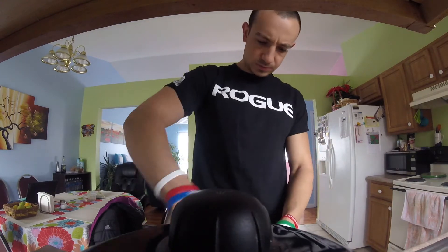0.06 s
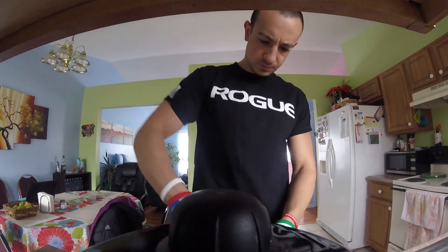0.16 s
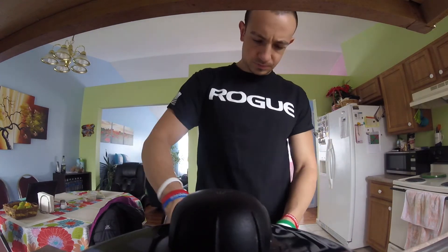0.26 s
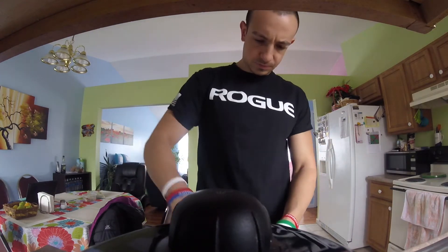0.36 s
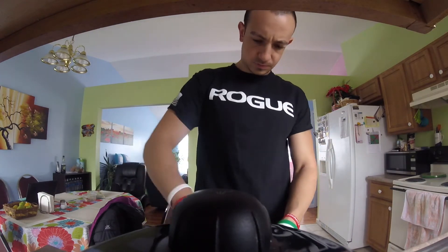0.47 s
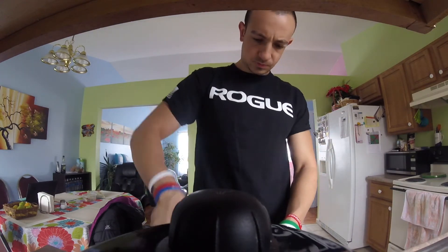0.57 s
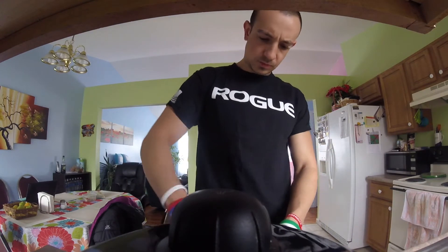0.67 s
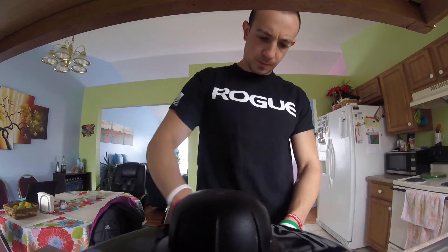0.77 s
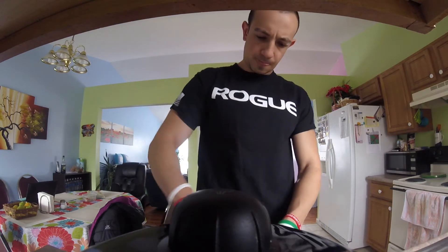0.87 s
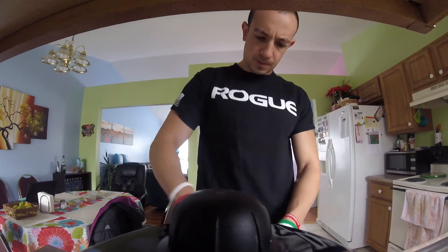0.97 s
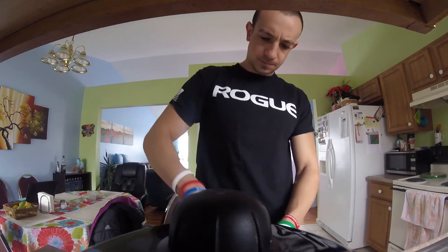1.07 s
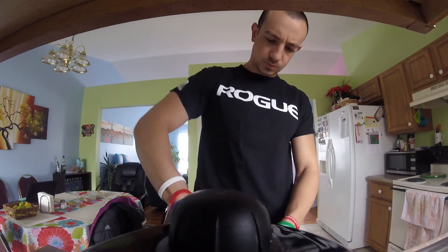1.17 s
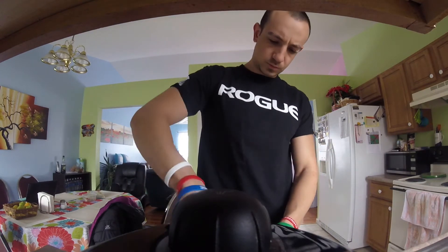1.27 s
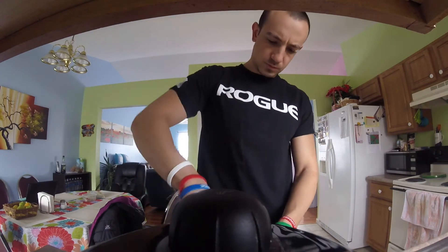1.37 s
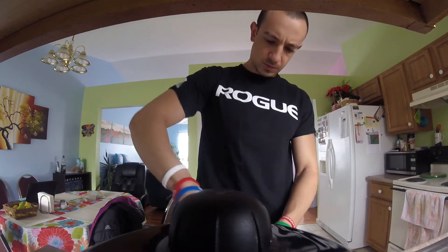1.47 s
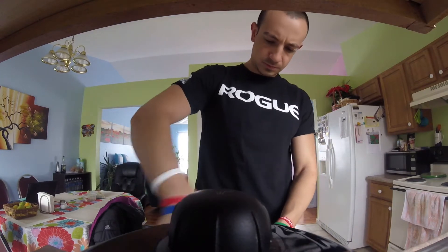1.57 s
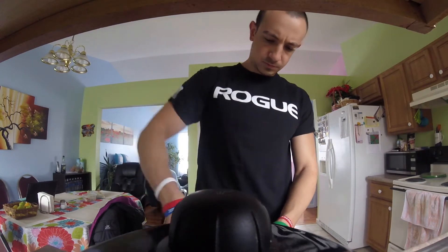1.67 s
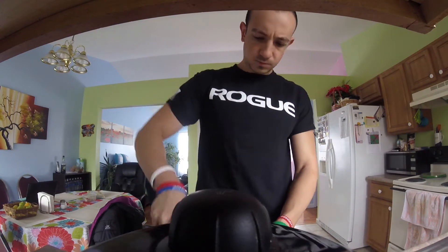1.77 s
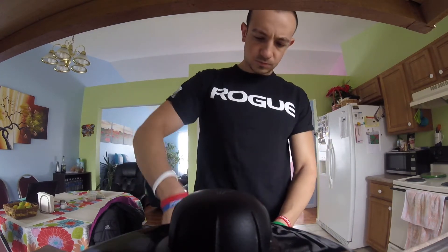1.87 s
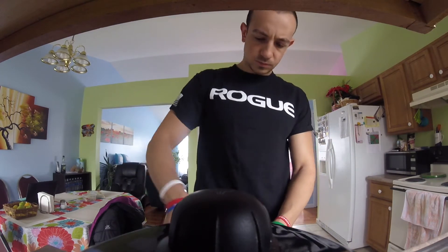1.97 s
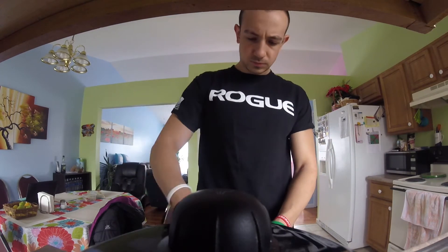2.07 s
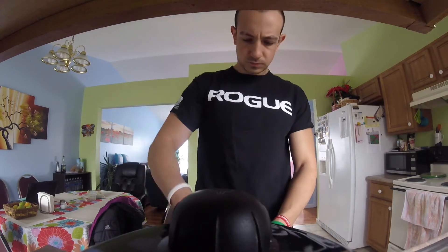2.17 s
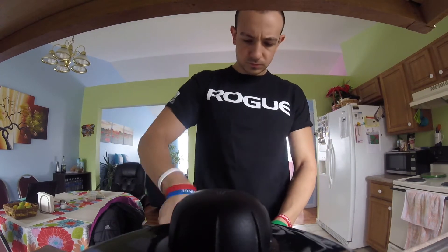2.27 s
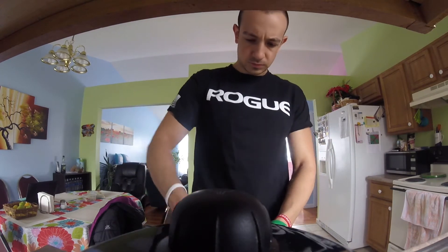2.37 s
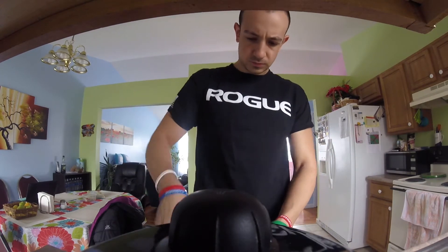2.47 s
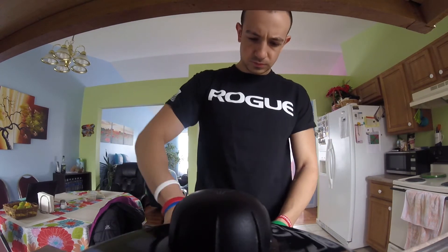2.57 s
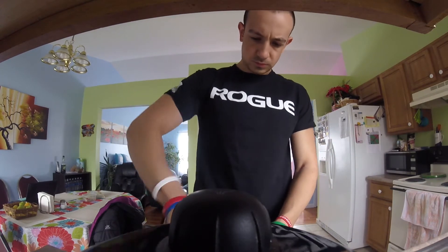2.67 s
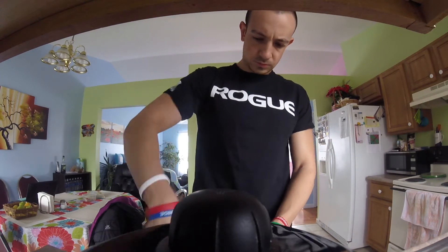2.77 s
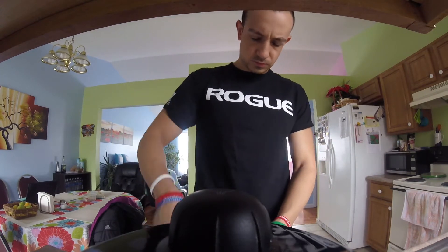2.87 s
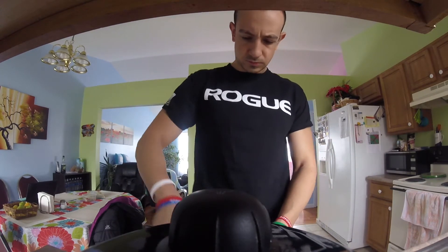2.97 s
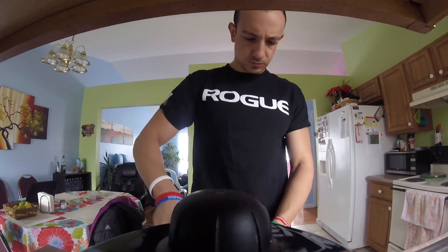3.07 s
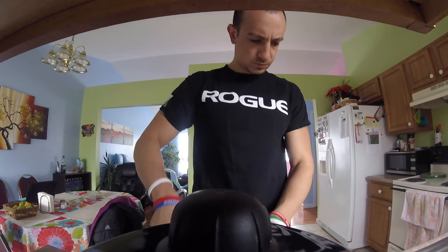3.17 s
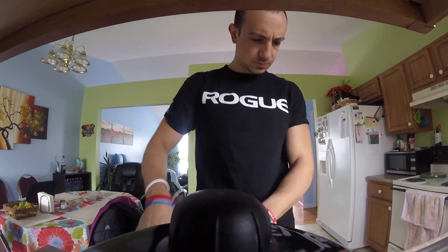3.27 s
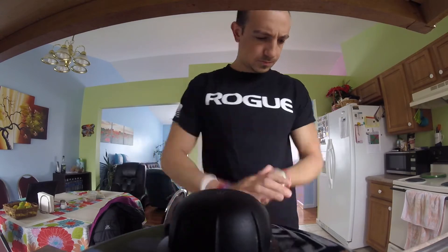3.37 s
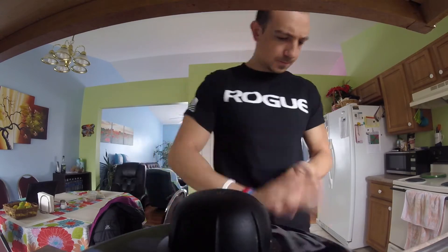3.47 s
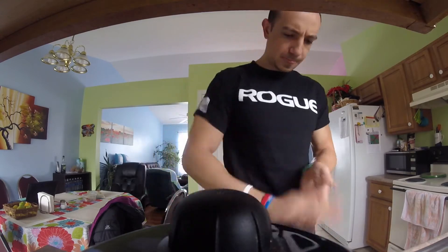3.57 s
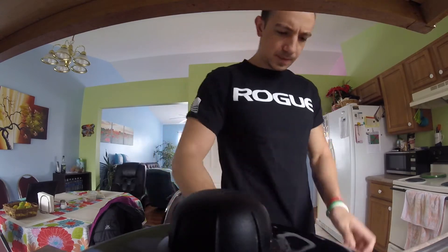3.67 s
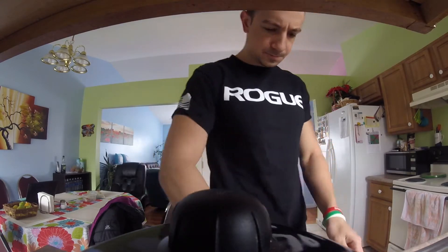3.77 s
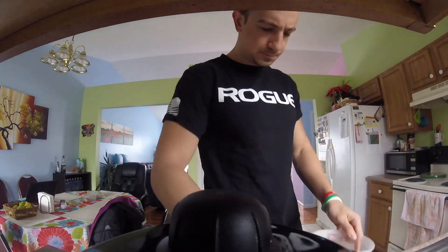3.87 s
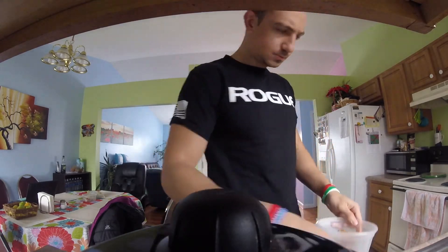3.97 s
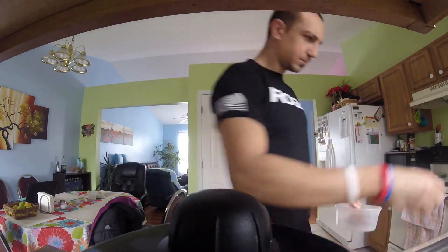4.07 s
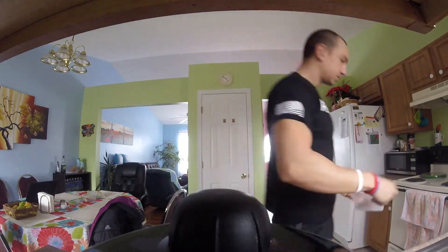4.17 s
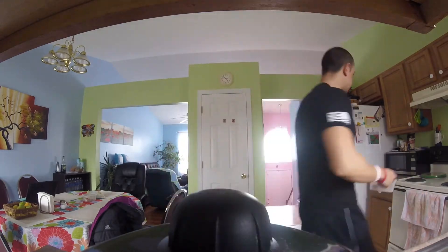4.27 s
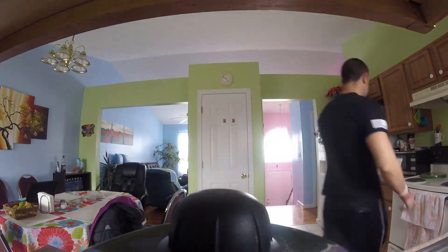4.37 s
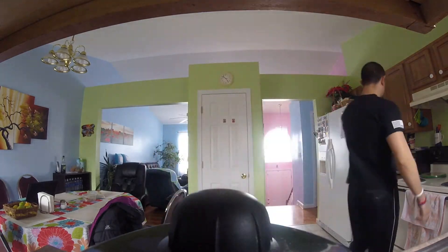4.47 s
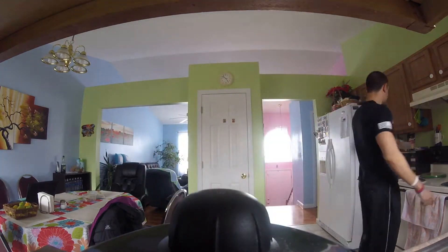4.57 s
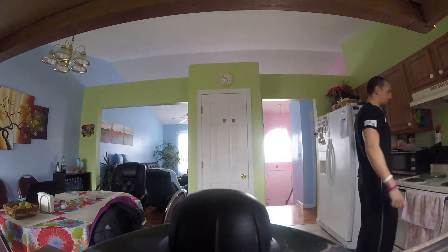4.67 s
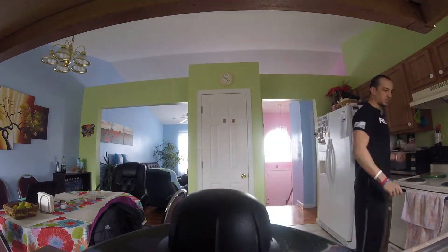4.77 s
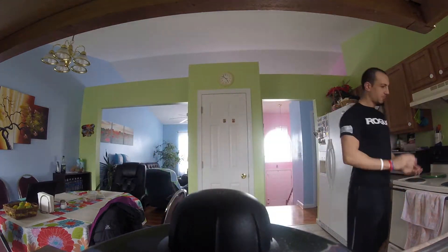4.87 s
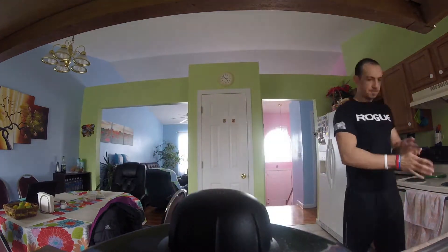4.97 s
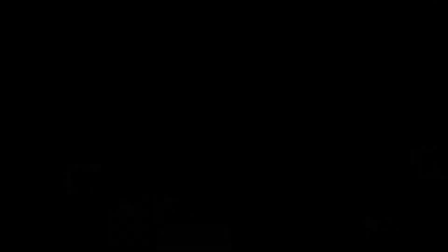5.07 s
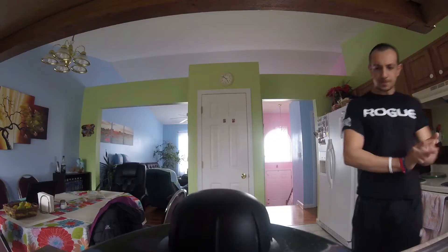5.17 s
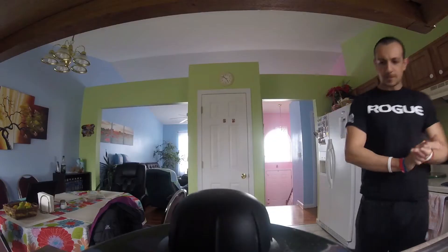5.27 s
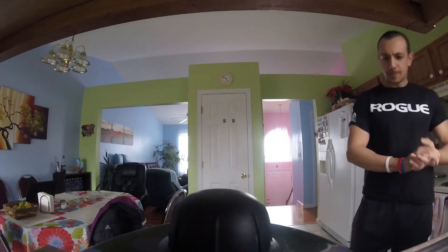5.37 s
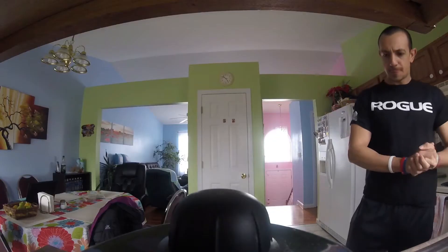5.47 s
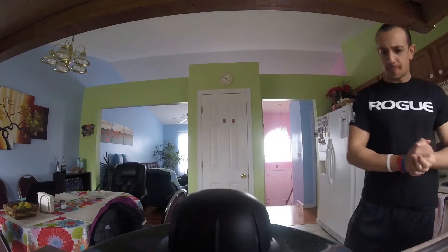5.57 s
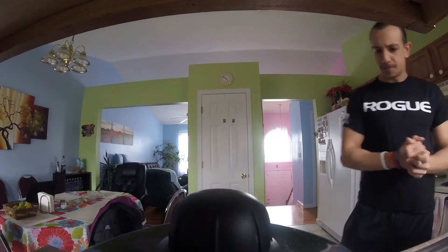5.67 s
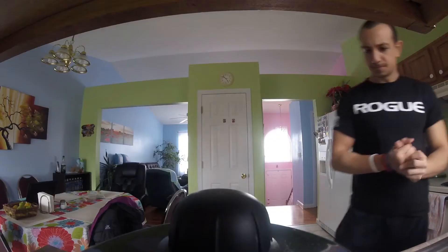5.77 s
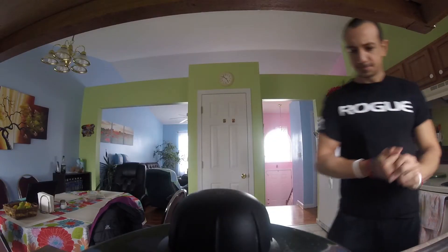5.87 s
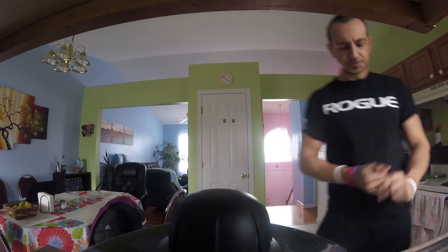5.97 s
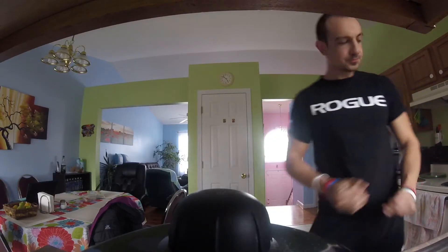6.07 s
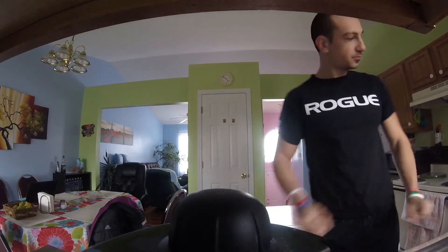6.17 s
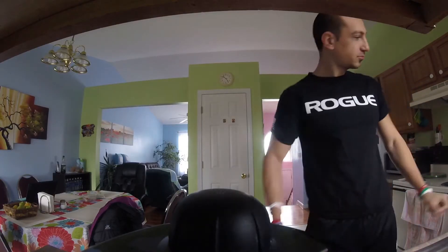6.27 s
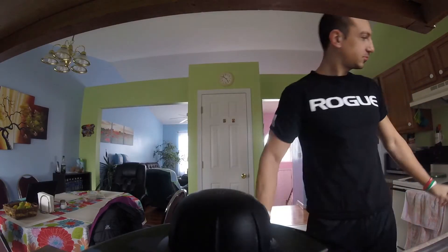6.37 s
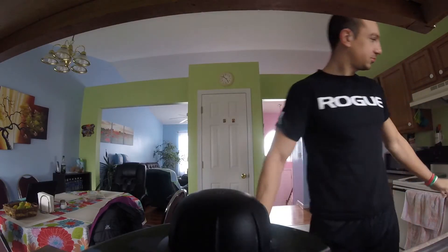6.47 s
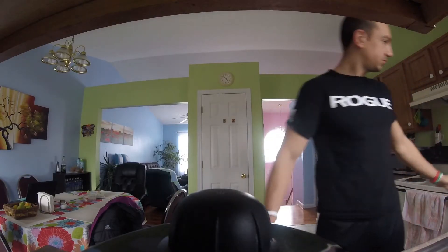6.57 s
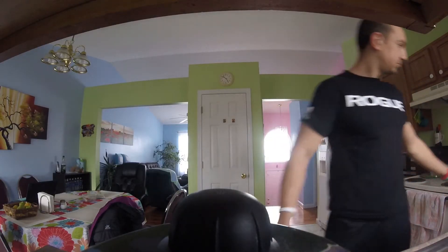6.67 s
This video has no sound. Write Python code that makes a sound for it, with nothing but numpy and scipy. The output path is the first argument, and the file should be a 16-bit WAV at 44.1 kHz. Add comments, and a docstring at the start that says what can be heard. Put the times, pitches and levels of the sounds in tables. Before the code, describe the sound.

From 0 to about 3.2 s, a spoon stirs a stiff mix in a steel bowl, heard very close from a microphone on the same counter. Irregular dull thuds, several each second, boom through the counter, strongest around 0.6-1.1 s and 1.8-2.8 s, some slightly overloaded. Low rocking rumble and dragging lie beneath; thin, gritty steel scrapes and short clinks ride above. At 3.32 s two very quick raps on the rim crack brightly and shimmer briefly over a heavy thump. The kitchen then falls quiet: small clicks around 3.5-3.6 s, soft footfalls, cloth rustle, and distant objects set down, clearest at 4.67-4.73 and 4.95 s. At 5.12 s sound drops almost to silence for an instant, then returns with a different background: low steady hum, faint rustling and soft taps near 5.4, 5.7 and 5.8 s, until about 6.7 s.

```python
"""A spoon stirs a stiff mix in a steel bowl on a kitchen counter, with the microphone on the same counter.
For 3.3 s blows thud through the counter as beating modes; filtered-noise scrapes and clinks come by air.
Two raps on the rim end the stirring; then small things are set down across the room as short noise bursts,
soft footfalls rumble in low noise and cloth rustles. At 5.12 s comes a near-silent edit cut of 33 ms,
then another background with a low hum, more rustling and a few last things set down."""
import sys
import numpy as np
from scipy import signal
from scipy.fft import rfft, irfft
from scipy.io import wavfile
from scipy.ndimage import uniform_filter1d

SR = 44100
rng = np.random.default_rng(int(sys.argv[2]) if len(sys.argv) > 2 else 0)


def output_pcm(signal):
    """Save a mono or channel-first signal as 16-bit PCM at the path in sys.argv[1].

    Samples are clipped to [-1, 1] before scaling.
    """
    pcm = np.clip(np.atleast_2d(signal).T, -1, 1) * 32767
    wavfile.write(sys.argv[1], SR, np.round(pcm).astype(np.int16))


N = 296352

# counter modes, a close pair and then overtones: f/Hz, level/dB, t60/s
COUNTER_MODES = [(238.64, 2.5, 0.13), (261.7, 2.5, 0.086), (517, -11, 0.038), (621, 4.5, 0.054),
                 (819, 4.5, 0.031), (944, -7, 0.043), (1255, -8, 0.033)]
# bowl modes: f/Hz, width/Hz, level/dB
BOWL_MODES = [(1275, 150, -7), (1920, 14, -15), (2593, 55, -12.5), (3060, 73, -3.5), (4020, 24, -11.5),
              (5560, 470, -10), (6210, 63, -28), (7680, 54, -12), (7600, 110, -12), (9480, 93, -29),
              (11950, 140, -9), (14000, 900, -16)]
# strength of the stirring: t/s, scrape treble/dB, drag on the counter/dB, scrape body/dB
STIRRING = [(0.0, -68, -30, -55.5), (0.16, -57, -39.5, -62.5), (0.27, -64, -46.5, -60),
            (0.43, -64.5, -32.5, -66), (0.54, -72, -38.5, -58.5), (0.64, -59, -25.5, -57.5),
            (0.73, -72, -32, -56.5), (0.81, -53.5, -23, -59), (0.87, -57, -19.5, -49),
            (0.95, -54, -25, -48.5), (1.04, -57, -19.5, -59), (1.1, -74, -31.5, -75),
            (1.18, -65, -43, -64.5), (1.38, -73, -38, -67.5), (1.66, -59, -36.5, -57.5),
            (1.75, -67, -40, -63), (1.92, -73, -32.5, -59.5), (2.05, -55, -34.5, -54),
            (2.1, -51.5, -23.5, -48.5), (2.21, -55, -22, -54), (2.25, -62, -24, -55), (2.36, -54, -29, -56),
            (2.53, -77, -43, -78), (2.67, -64, -36.5, -60), (2.84, -50.5, -36.5, -51.5),
            (2.92, -74, -38, -62.5), (3.08, -68, -33.5, -62), (3.22, -72.5, -38, -70),
            (3.3, -67, -45.5, -63)]
# the near-silent edit cut between two backgrounds: start/s, end/s
CUT = (5.119, 5.152)


def thuds(lead_s=0.007683, rise_s=0.0036, overtones_spread_db=2.5):
    """Two close counter modes start in opposite phase: the thud swells, then beats away."""
    # blows felt through the counter: t/s, peak level/dB, upper mode of the pair against lower/dB,
    # ring time as a factor (held to 3 at most), mean overtone level/dB
    blows = [(0.022, -27.5, 3, 1, -26), (0.052, -21.5, 3, 0.94, -31.0), (0.082, -20, 5, 0.71, -29),
             (0.123, -40, 9, 0.89, -33), (0.159, -16.5, 4.5, 1.34, -33), (0.23, -30, 5, 1.2, -28),
             (0.323, -25, -12, 3.6, -36), (0.392, -18.5, 2.5, 2.2, -31.0), (0.454, -18, -8, 3.4, -30.5),
             (0.494, -14, 4, 1.3, -31.5), (0.53, -27, 4, 0.78, -31.0), (0.56, -18.5, 2, 0.85, -30),
             (0.625, -12.5, -2, 2, -31.0), (0.658, -13, 1, 0.75, -27), (0.706, -12.5, -5, 1.8, -35),
             (0.787, -19.5, 4, 2.1, -31.0), (0.796, -8.5, 12, 1.8, -36), (0.845, -17, 7, 1.4, -40),
             (0.906, -12, 1, 1.4, -31.0), (0.969, -11.5, -0.5, 0.63, -31.0),
             (0.996, -6.5, 2.2, 1.17, -31.0), (1.056, -12.5, 2, 1.3, -26), (1.144, -25.5, -3, 1.9, -35),
             (1.175, -17, 3.5, 2.4, -33), (1.223, -18, 2, 1.1, -29), (1.266, -50, 14, 0.88, -31.0),
             (1.342, -28.5, -3, 1.3, -26), (1.419, -19, 5, 2.3, -34), (1.453, -18.5, 0.7, 0.46, -31.0),
             (1.521, -17.5, -1, 0.73, -32), (1.544, -12, 0.8, 1.47, -31.0), (1.659, -26, 0.1, 1.2, -31.0),
             (1.686, -27.5, -18, 1.5, -27), (1.713, -24.5, 0.1, 1.8, -32), (1.792, -46, -2, 0.86, -31.0),
             (1.821, -13, 1.5, 1.4, -29), (1.857, -13.5, 0, 1.9, -35), (1.882, -8.5, 11.5, 0.66, -31.0),
             (1.95, -31, 6, 0.42, -31.0), (1.99, -18, -11, 2.2, -38), (2.062, -17.5, -2, 3, -31.0),
             (2.116, -15, -4, 1.2, -25), (2.159, -13.5, -6, 1.7, -33), (2.203, -9.5, 5, 2.4, -33),
             (2.248, -24, -9, 1, -33), (2.276, -12, -1.5, 0.63, -24), (2.339, -9, -3.8, 1.87, -25.5),
             (2.429, -21.5, 3.5, 0.63, -25), (2.487, -27.5, 5, 0.61, -31.0), (2.55, -10, -8.5, 1.5, -29),
             (2.609, -13, 2, 0.75, -30), (2.689, -26.5, 0.1, 1, -27), (2.714, -7.5, 0, 0.97, -25),
             (2.77, -16.5, -6, 1.14, -32), (2.819, -30, -2, 0.62, -31.0), (2.845, -31, 1, 0.8, -31.0),
             (2.899, -48, 5, 1.5, -31.0), (2.933, -22.5, 3, 2.2, -30), (2.958, -15, 2, 2.1, -32),
             (2.995, -16.5, 4, 3.6, -38), (3.062, -12, -2.3, 0.97, -34.5), (3.139, -29, -14, 1.9, -30),
             (3.179, -34, 0.1, 1.4, -28), (3.218, -33, -2, 1.8, -29), (3.327, -8, 3.5, 1.18, -30),
             (3.799, -34, 6, 1.8, -31.0)]
    out = np.zeros(N)
    t = np.arange(SR // 4) / SR
    hz, db, t60 = np.transpose(COUNTER_MODES)[:, :, None]
    place = np.arange(len(COUNTER_MODES))[:, None]
    sign = (-1.) ** place
    spots = rng.standard_normal((len(blows), len(COUNTER_MODES), 1))
    for (s, peak_db, upper_db, lasting, overtones_db), spot in zip(blows, spots):
        over_db = overtones_db + overtones_spread_db * spot
        decay_db = 60 * t / (t60 * np.minimum(lasting, 3))
        level_db = db + (place == 1) * upper_db + (place > 1) * over_db - decay_db
        modes = sign * amp(level_db) * np.sin(2 * np.pi * hz * t)
        ring = modes.sum(0) * (1 - np.exp(-t / rise_s))
        add(out, s - lead_s, amp(peak_db) * peaked(ring))
    return out


def drag(over_db=-42.5):
    """The dragging spoon shakes the same counter modes without pause."""
    shake = rng.standard_normal(N)
    modes = []
    for hz, db, t60 in COUNTER_MODES:
        ring = resonate(resonate(shake, hz, 2.4 / t60), hz, 76.0)
        modes.append(amp(db) * evened(ring))
    shaken = evened(modes[0] + modes[1] + amp(over_db) * sum(modes[2:]))
    return curve(STIRRING, axis=2) * shaken


def rocking(wobble=0.0907, fuzz=0.56, octave_fuzz=0.93):
    """The counter sways under the arm: a wavering tone, its octave, and some rumble around them."""
    # sway: t/s, f/Hz, level/dB, octave level/dB
    sway = [(0.0, 70.3, -51.5, -56.5), (0.11, 70.82, -38.5, -54), (0.23, 70.06, -51, -72),
            (0.5, 77.37, -45.5, -45), (0.61, 76.45, -37, -59), (0.68, 72.56, -28, -37),
            (0.73, 73.5, -40, -49), (0.98, 73.56, -31, -28.5), (1.06, 61.9, -34, -40),
            (1.28, 61.4, -52, -86), (1.39, 68.5, -33, -47), (1.48, 67.6, -47, -65), (1.56, 72.95, -32, -37),
            (1.69, 75.5, -47.5, -81), (1.84, 74.95, -37, -37), (1.94, 58, -26.5, -26),
            (2.07, 56.77, -43, -60), (2.12, 56.3, -28, -27), (2.18, 58, -32, -30), (2.31, 75.9, -36, -44),
            (2.35, 75.3, -28.5, -31), (2.48, 75.7, -43, -61), (2.6, 76.8, -41, -48), (2.65, 69.6, -49, -70),
            (2.73, 59.1, -33.5, -41), (2.83, 60.9, -40.5, -55), (2.92, 70.2, -47.5, -71),
            (3.06, 66.9, -34, -45), (3.25, 62.9, -59, -80), (3.32, 71.7, -48, -60), (3.41, 72, -57, -87),
            (3.53, 59.7, -56.5, -80), (3.83, 65.5, -51, -82), (4.0, 78.5, -69, -83)]
    waver, rumble = rng.standard_normal((N, 2)).T
    hz = over_time(sway, axis=1) * (1 + wobble * evened(uniform_filter1d(waver, size=2000)))
    turn = 2 * np.pi * np.cumsum(hz) / SR
    low = np.sqrt(2) * np.sin(turn) + fuzz * evened(band(rumble, (50, 85)))
    octave = np.sqrt(2) * np.sin(2 * turn) + octave_fuzz * evened(band(rumble, (100, 150)))
    both = curve(sway, axis=2) * evened(low) + curve(sway, axis=3) * evened(octave)
    return band(both, (38, 400))


def scrape(slips_per_s=500., spread_db=4.5, smooth=0.99, ring_db=-5.0, patchy_db=3.5):
    """Uneven slips of steel on steel over a smooth hiss; the colour shifts in random patches."""
    # colour of the steel-on-steel noise: f/Hz, level/dB per Hz
    steel = [(500, -20), (1000, 2), (2200, -10), (3100, 2), (4500, -0.5), (7800, 3), (9500, 1), (11500, -9),
             (14000, 2), (16000, -1.5)]
    slipping = rng.random(N) < slips_per_s / SR
    size = amp(spread_db * np.minimum(rng.exponential(1, N), 4)) * slipping
    slips = signal.lfilter([1], [1, -.975], size) * rng.standard_normal(N)
    drive = evened(slips) + smooth * rng.standard_normal(N)

    # each mode's level drifts slowly at random
    drifts = rng.standard_normal((N // 1024 + 2, len(BOWL_MODES))).T
    bowl = np.zeros(N)
    for (hz, width, db), knots in zip(BOWL_MODES, drifts):
        drift = np.interp(np.arange(N) / 1024, np.arange(len(knots)), knots)
        bowl += amp(db + 8.7 * drift) * evened(resonate(drive, hz, width))

    rubbed = evened(coloured(drive, steel)) + amp(ring_db) * evened(bowl)
    hz, t, z = signal.stft(rubbed, SR, nperseg=256)
    z = z * amp(patchy_db * patches(len(t), bins=len(hz), count=8))
    treble = np.clip((hz[:, None] - 5500) / 2000, 0, 1)
    body = evened(signal.istft(z * (1 - treble), SR, nperseg=256)[1][:N])
    fizz = evened(signal.istft(z * treble, SR, nperseg=256)[1][:N])
    return curve(STIRRING, axis=3) * body + curve(STIRRING, axis=1) * fizz


def clinks(ring_db=-7.0, away_db=22.0, low_away_db=29.0, low_width=50.0, damping_hz=149.0):
    """A blow rings the bowl modes and the counter overtones that lie near its spot's pitches."""
    # spoon on bowl: t/s, level/dB, lows/dB, highs/dB, top/dB, t60/s, tail/dB, bright f/Hz, knock f/Hz
    knocks = [(0.0503, -43, -0.5, 2, -21, 0.02, -25, 3360, 495),
              (0.0765, -33, -9.5, -9, -20, 0.035, -23, 3200, 600),
              (0.161, -47, -6, -10, -7, 0.053, -12, 1700, 509),
              (0.3456, -43, 2.5, -18, -26, 0.052, -17.0, 1900, 493),
              (0.3843, -43, -10, -10, -16, 0.067, -21, 2910, 495),
              (0.4033, -40, -9, -9, -6, 0.04, -17.0, 3030, 517),
              (0.4274, -41, -13, -14, -16, 0.04, -17.0, 2920, 498),
              (0.4426, -33.5, -34, -12, -9, 0.052, 0.5, 4200, 506),
              (0.4708, -35, -6, 1.5, -12, 0.021, -20, 1730, 493),
              (0.4816, -32, -14, 1, -16, 0.078, -9, 1970, 522),
              (0.533, -30, -16, -20, -29, 0.02, -24, 3040, 498),
              (0.5594, -48, 8, -16, -15, 0.04, -19, 3130, 533),
              (0.597, -41, -14, -15, -15, 0.035, -17.0, 2010, 611),
              (0.618, -39, -3.5, -5, -17, 0.058, -20, 2490, 848),
              (0.6355, -42, 10, -7, -7, 0.026, -26, 1780, 598),
              (0.6509, -28, -13, 4, -5, 0.047, -5, 8500, 493),
              (0.6973, -33.5, -15, -15, -14, 0.087, -17.0, 3100, 493),
              (0.7711, -38, -12, 8.5, -16, 0.047, -6, 7910, 493),
              (0.7907, -22.5, -25, -11, -26, 0.046, -10.5, 3050, 493),
              (0.8459, -40, 18, -18, -26, 0.04, -16, 1720, 614),
              (0.8664, -36, -11, 3, -7, 0.069, -3, 7770, 506),
              (0.9004, -30.5, -2.5, -14, 1, 0.049, -24, 7900, 493),
              (0.9518, -29, -3, -17, -25, 0.068, -23, 3240, 493),
              (0.9666, -29.5, -7, 3, -3, 0.04, -13, 3450, 576),
              (0.9897, -23.5, -6, -2, -7, 0.048, -12, 6560, 506),
              (1.041, -35.5, -5, -17, -26, 0.034, -17.0, 3460, 619),
              (1.0534, -39, 0, -14, -14, 0.036, -19, 1890, 536),
              (1.063, -32, -5.5, -22, -5, 0.061, -15, 1770, 493),
              (1.0994, -50.5, -17, 10.5, -18, 0.031, -23, 1810, 501),
              (1.1684, -53.5, 9, 1, -12, 0.064, -2, 1780, 851),
              (1.2121, -56, 3, -11, -20, 0.032, -5, 1720, 598),
              (1.3583, -50.5, 4, 1, -7, 0.053, -17.0, 3190, 778),
              (1.3818, -56, 3, 6, -7, 0.047, -2, 1730, 864), (1.42, -38, -6, 2, -4, 0.056, -28, 8470, 514),
              (1.4429, -37, 1, -19, -22, 0.033, -16, 2860, 595),
              (1.5161, -56, -6, -25, -22, 0.027, -17.0, 1950, 493),
              (1.5365, -29.5, -2, -15, -22, 0.037, -15, 2690, 786),
              (1.5534, -36.5, -18, 2, -7, 0.045, -7.5, 1700, 506),
              (1.6857, -41.5, -16, 2, -19, 0.035, -18, 7450, 600),
              (1.79, -47.5, -3, -13, -15, 0.044, -15, 3950, 721),
              (1.813, -47, -3, 5, -10, 0.04, -4, 3030, 493),
              (1.8345, -38.5, 0, 0, -21, 0.054, -9, 1750, 493),
              (1.8502, -49, 10.5, 9, -1, 0.12, -6, 2770, 651),
              (1.8786, -20.5, -2.5, 1, -20, 0.034, -17.5, 2400, 622),
              (1.9096, -33.5, -12, -10, -19, 0.045, -21, 5070, 606),
              (1.9784, -39, -20, -13, -15, 0.037, -17.0, 7850, 495),
              (1.9928, -33.5, -24, -12, -25, 0.036, -17.0, 3070, 493),
              (2.032, -38, -20, -12, -13, 0.046, -20, 3200, 584),
              (2.0981, -30, -5.5, -23, -20, 0.069, -17.0, 1920, 622),
              (2.1256, -37, -25, -17, -26, 0.04, -22, 1900, 493),
              (2.146, -31.5, -16, -3, -19, 0.058, -24, 3230, 549),
              (2.1826, -27.5, -21, -2, -14, 0.023, -13, 3060, 493),
              (2.2007, -24.5, -14, -1.5, -13, 0.046, -20, 2970, 506),
              (2.2494, -36.5, -18, -5, -22, 0.04, -19, 1950, 493),
              (2.2631, -39.5, 3, 8, -22, 0.027, -26, 3120, 630),
              (2.2853, -37, -9, -11, -10, 0.035, -16, 3080, 514),
              (2.3218, -36, 4, -1, -18, 0.035, -15, 2330, 673),
              (2.3341, -29.5, -8, -6, -23, 0.027, -10, 3130, 501),
              (2.363, -39, -11, 1.5, -15, 0.063, -8, 6170, 511),
              (2.4755, -38, -4.5, -26, -23, 0.065, -22, 1910, 1310),
              (2.5376, -32, 1.5, -22, -34, 0.06, -18, 3050, 598),
              (2.585, -40, 2, -21, -24, 0.12, -11, 2980, 643),
              (2.7097, -25.5, -3, -20, -8, 0.024, -15, 2470, 775),
              (2.7403, -45, -8, 5, -14, 0.04, -17.0, 6250, 493),
              (2.7928, -36.5, -18, -2, -16, 0.04, -21, 5290, 493),
              (2.828, -55, -29, -9, -19, 0.036, -17.0, 4940, 493),
              (2.8434, -51, -12, 20.5, -7, 0.028, -26, 7690, 514),
              (2.8771, -33.5, -16, -15, -31, 0.06, -17.0, 3000, 851),
              (2.9307, -36, -21, -4, -3, 0.029, -10, 5390, 503),
              (2.9515, -34, -9, -1.5, -16, 0.12, -23, 6150, 746),
              (2.9838, -30, -5, -8, -21, 0.036, -15, 2630, 589),
              (3.0482, -25.5, -26, -8.5, -23, 0.029, -15, 2960, 589),
              (3.1312, -35, -23, -21, -26, 0.04, -17.0, 3060, 538),
              (3.21, -51.5, 3, 1, -16, 0.048, -15, 3260, 493)]
    out = np.zeros(N)
    overtones_hz = np.transpose(COUNTER_MODES[2:])[0]
    overtones_width = np.full(len(overtones_hz), low_width)
    bowl_hz, width, _ = np.transpose(BOWL_MODES)
    for s, *blow, spot_hz, knock_hz in knocks:
        rings = near(bowl_hz, width + damping_hz, ring_db, away_db, spot_hz)
        rings += near(overtones_hz, overtones_width, blow[1], low_away_db, knock_hz)  # as strong as the lows
        add(out, s, click(*blow, rings, crack=2.14, tail_t60=.3))
    return out


def raps(crack_t60=0.0055, ring_db=-18.5, ring_t60=0.16, swell_s=0.0085):
    """A hard crack, then clusters of rim modes shimmer and fade while the belly clonks."""
    # the spoon is rapped on the rim and bounces: t/s, peak level/dB
    rim_blows = [(3.318, -20), (3.3277, -30.5)]
    # rim modes: f/Hz, width/Hz, level/dB
    rim = [(1180, 200, -6), (3640, 570, -16), (3980, 780, 3), (4800, 410, -0.5), (7400, 910, 2),
           (9250, 430, 3.5), (13700, 1100, 0.5), (15100, 600, -31)]
    # the bowl's belly, swelling with the first rap: f/Hz, peak level/dB
    belly = [(497, -25), (632, -29)]
    out = np.zeros(N)
    t = np.arange(SR // 4) / SR
    for s, peak_db in rim_blows:
        fade = amp(-60 * t / crack_t60) + amp(ring_db - 60 * t / ring_t60)
        blow = rng.standard_normal(len(t)) * fade
        ring = sum(amp(db) * evened(resonate(resonate(blow, f, w), f, 2.8 * w)) for f, w, db in rim)
        add(out, s, amp(peak_db) * peaked(ring))
    swell = (t / swell_s * np.exp(1 - t / swell_s)) ** 2
    clonk = sum(amp(db) * np.sin(2 * np.pi * hz * t) for hz, db in belly)
    add(out, rim_blows[0][0], swell * clonk)
    return out


def tidying(low_width=32.0, width=510.0):
    """Small things set down across the room, each with a low and a bright ring of its own."""
    # things set down: t/s, level/dB, lows/dB, highs/dB, top/dB, t60/s, tail/dB,
    # low ring f/Hz, bright ring f/Hz, bright ring level/dB
    things = [(3.4104, -54.5, -13, 4.5, 9, 0.07, -6, 369, 6400, -4),
              (3.498, -34, -19, 5.5, 8.5, 0.037, -16.5, 1454, 5800, 3.5),
              (3.5643, -65, 15, 4, 3, 0.075, -3, 926, 6440, 0.5),
              (3.5955, -36.5, -9, 4, 8, 0.023, -20, 468, 6120, -6),
              (3.5984, -46, -7.5, 4, 13, 0.08, -14, 1110, 6250, -7),
              (3.7747, -49.5, 1, -4, -16, 0.045, -9.0, 326, 5100, -5),
              (3.7918, -47.5, 1, -18, -26, 0.057, -11, 333, 4900, -10),
              (3.9394, -57, -18, -1, -18, 0.061, -9.0, 369, 3930, 1),
              (4.1899, -53, 6.5, 1, -13, 0.13, -9.0, 453, 5560, 2),
              (4.334, -50, -13, -22, -23, 0.21, -3, 417, 3250, 3),
              (4.3909, -45, -6, -23, -23, 0.21, -9.0, 395, 2330, 8.5),
              (4.4054, -48.5, -8, -20, -28, 0.085, -6, 437, 2160, 12),
              (4.5905, -48, -0.5, -5, -19, 0.14, 1, 406, 2060, -9),
              (4.6702, -33.5, -2, -9.5, -24, 0.051, 5, 578, 4800, 4),
              (4.7308, -31.5, -3.5, -6, -13, 0.14, -3, 899, 4170, 0.5),
              (4.8584, -55.5, -2, 3, 1, 0.059, -7, 616, 4460, -4),
              (4.9486, -39, -8.5, 1.5, -6, 0.093, -7, 390, 6210, 2),
              (4.9784, -53, 1, 5, 7, 0.16, -13, 435, 6180, -4),
              (5.0499, -51.5, -3, 3, -8, 0.07, -6, 467, 5590, -4),
              (5.3782, -46.5, -26, -24, -37, 0.076, 0, 444, 5800, -2),
              (5.6875, -52.5, -12, -19, -32, 0.09, -9.0, 342, 3580, 2),
              (5.8092, -48.5, -3.5, -21, -35, 0.087, -2, 407, 3120, -5)]
    out = np.zeros(N)
    for s, *blow, low_hz, hz, ring_db in things:
        rings = [(low_hz, low_width, blow[1]), (hz, width, ring_db)]  # low ring as strong as the lows
        add(out, s, click(*blow, rings, crack=0.18, tail_t60=0.26))
    return out


def steps(rise_s=0.01, t60=0.38):
    """Loudness of the footfalls: each swells quickly and dies away."""
    # soft footfalls: t/s, level/dB
    footfalls = [(3.561, -54.5), (3.788, -59), (3.91, -79), (4.169, -55), (4.40, -56), (4.59, -54),
                 (4.666, -44.5), (4.871, -60), (5.03, -55)]
    t = np.arange(SR) / SR
    out = np.zeros(N)
    for s, db in footfalls:
        add(out, s, amp(db - 60 * t / t60) * np.minimum(t / rise_s, 1))
    return out


def room(air_db=-56, hum_db=-53.5):
    """Kitchen air, footfalls and cloth as coloured noise until the cut; low hum and cloth from there on."""
    # kitchen air before the cut: f/Hz, level/dB per Hz
    air = [(15, -16), (25, -8), (70, 6), (157, -12.5), (242, 7.5), (335, -13.5), (545, -10), (775, -12),
           (1560, -24), (6740, -28), (16000, -45)]
    # low hum after it: f/Hz, level/dB per Hz
    hum = [(15, -33), (25, -22), (55, -4.5), (72, -3), (84, 1.5), (100, -17), (170, -7.5), (263, -16.5),
           (725, -28), (2230, -32), (3800, -45), (7000, -34.5), (10000, -45), (13000, -51), (14500, -85)]
    # floorboards under the footfalls: f/Hz, level/dB per Hz
    floor = [(35, -27), (70, -10), (140, -14), (240, -1.5), (350, 2), (600, -26), (1200, -33)]
    # cloth and hands, a list before the cut and one after: t/s, level/dB
    rustle = [
        [(4.05, -67), (4.17, -66), (4.22, -59.5), (4.3, -59), (4.45, -57.5), (4.55, -62), (4.65, -64),
         (4.8, -68), (4.9, -57.5), (5.02, -61), (5.12, -57.5)],
        [(5.15, -56.5), (5.25, -61.5), (5.4, -61), (5.45, -69), (5.55, -65.5), (5.6, -63.5), (5.75, -65.5),
         (5.85, -61), (6.08, -64), (6.14, -67.5), (6.52, -73), (6.58, -64), (6.72, -74)],
    ]
    # colour of the cloth, before and after: f/Hz, level/dB per Hz
    cloth = [
        [(500, 9.5), (1500, -6), (3000, -6), (6500, -11), (10000, -12.5), (16000, -15)],
        [(700, 4.5), (1500, 5), (3000, 2.5), (6200, 0), (7000, -21), (10000, -16), (14000, -66)],
    ]
    t = np.arange(N) / SR
    before = amp(air_db) * hiss(air, patchy_db=0, flicker_db=0.6)
    before = before + steps() * hiss(floor, patchy_db=0, flicker_db=2)
    before = before + curve(rustle[0], axis=1) * hiss(cloth[0], patchy_db=0, flicker_db=0)
    after = amp(hum_db) * hiss(hum, patchy_db=3, flicker_db=0)
    after = after + curve(rustle[1], axis=1) * hiss(cloth[1], patchy_db=3, flicker_db=0.7)
    return np.where(t < CUT[0], before, after)


def click(level_db, low_db, high_db, top_db, t60, tail_db, rings, crack, tail_t60):
    """A short burst: a sharp crack, a rattle, the modes it rings, and a slower tail from the walls."""
    # lows, mids, highs, top: lower f/Hz, upper f/Hz
    bands = [(300, 1500), (1500, 6000), (6000, 11000), (11000, 16500)]
    t = np.arange(8192) / SR
    quick, ringing, late = rng.standard_normal((3, len(t)))
    blow = crack * np.exp(-t / 0.00025) + amp(-60 * t / t60)
    tail = late * amp(tail_db - 60 * t / tail_t60) * (1 - np.exp(-t / 0.004))
    burst = quick * blow + tail
    parts = [peaked(band(burst, edges)) for edges in bands]
    rung = sum(amp(db) * peaked(resonate(ringing * blow, f, w)) for f, w, db in rings)
    noise = sum(amp(db) * part for db, part in zip((low_db, -3, high_db, top_db), parts))
    return amp(level_db) * (rung + noise)


def near(modes_hz, width, db, away_db, pitch_hz):
    """Modes ring the weaker, by away_db an octave, the further they lie from the struck spot's pitch."""
    return list(zip(modes_hz, width, db - away_db * abs(np.log2(modes_hz / pitch_hz))))


def hiss(points, patchy_db, flicker_db):
    """Noise of rms 1 with drifting patches and a flicker shared by all bands."""
    frames = N // 256 + 5
    hz = np.fft.rfftfreq(1024, 1 / SR)
    a, b = rng.standard_normal((frames, 513, 2)).T
    flicker = evened(uniform_filter1d(rng.standard_normal(frames), size=4))
    moving_db = patchy_db * patches(frames, bins=513, count=12) + flicker_db * flicker
    z = (a + 1j * b) * amp(read(points, hz)[:, None] + moving_db)
    return evened(signal.istft(z, nperseg=1024, noverlap=768)[1][:N])


def patches(frames, bins, count):
    """A blotchy random field of rms 1 over frequency and time."""
    field = rng.standard_normal((frames, bins)).T
    across_bins = uniform_filter1d(field, size=count, axis=0)
    return evened(uniform_filter1d(across_bins, size=10, axis=1))


def resonate(x, hz, width):
    """One resonance with a gain of about 1 at its centre, from a single complex pole."""
    pole = np.exp((2j * hz - width) * np.pi / SR)
    return 2 * signal.lfilter([1 - abs(pole)], [1, -pole], x + 0j).real


def band(x, edges_hz):
    """A causal band-pass."""
    return signal.sosfilt(signal.butter(3, edges_hz, "bandpass", fs=SR, output="sos"), x)


def coloured(x, points):
    """Shapes a signal by a spectrum table."""
    gain = amp(read(points, np.fft.rfftfreq(len(x), 1 / SR)))
    return irfft(rfft(x) * gain, len(x))


def read(points, hz):
    """A spectrum table on a log-frequency axis."""
    f, value = np.transpose(points)
    return np.interp(np.log(hz + 1), np.log(f + 1), value)


def over_time(rows, axis):
    """One column as a curve over time."""
    rows = np.array(rows)
    return np.interp(np.arange(N) / SR, rows[:, 0], rows[:, axis])


def curve(rows, axis):
    """Gain over time from one dB column, silent outside the table."""
    t = np.arange(N) / SR
    return amp(over_time(rows, axis)) * (t >= rows[0][0]) * (t <= rows[-1][0])


def add(mix, s, sound):
    """Mixes a sound in at a time."""
    part = mix[max(round(s * SR), 0):][:len(sound)]
    part += sound[:len(part)]


def amp(db):
    """Decibels to gain."""
    return 10 ** (np.asarray(db) / 20)


def evened(x):
    """Scales to rms 1."""
    return x / np.sqrt(np.mean(x ** 2) + 1e-20)


def peaked(x):
    """Scales to peak 1."""
    return x / abs(x).max()


def scene():
    """Counter-borne and air-borne sound together at the microphone."""
    # the microphone's case colours clinks and things set down: f/Hz, level/dB
    case = [(2000, -1.5), (3100, -0.5), (4300, -3), (5800, -1.5), (7600, -2.5), (8600, 0.5), (9500, 0),
            (10600, -8.5), (11700, -6.5), (13200, -2), (14400, -3), (16000, -5.5)]
    counter_borne = thuds() + drag() + rocking()
    cased = coloured(clinks() + tidying(), case)
    return (counter_borne + scrape() + raps() + cased + room())[None]


def record(dry, lopsided=0.13, ceiling=0.72, edge_hz=15900):
    """The shaken capsule bends loud thuds; the edit cut is near-silent; then the band limit."""
    t = np.arange(N) / SR
    bent = ceiling * np.tanh((dry + lopsided * dry ** 2) / ceiling)
    bent = signal.lfilter([1, -1], [1, -.997], bent)  # takes out the offset the lopsided bend leaves
    outside_s = np.maximum(CUT[0] - t, t - CUT[1])
    open_gain = np.clip(outside_s / 0.0014, .004, 1)  # 1.4 ms fades down to near-silence
    low_pass = signal.firwin(511, edge_hz, window=("kaiser", 9), fs=SR)
    return signal.oaconvolve(bent * open_gain, low_pass[None], "same")


dry = scene()
out = record(dry)
output_pcm(out)
```